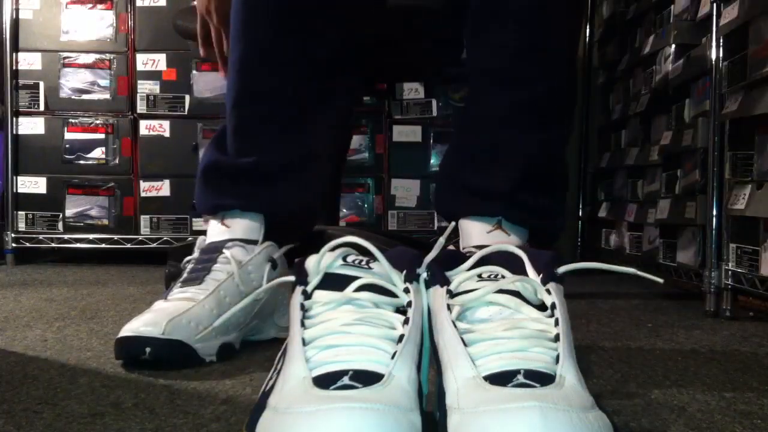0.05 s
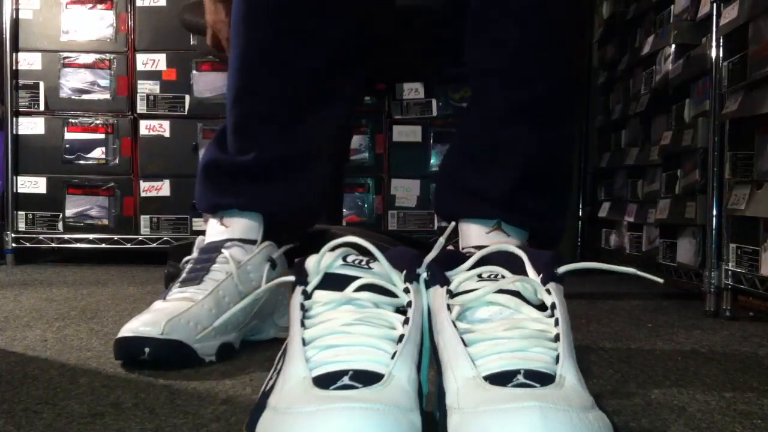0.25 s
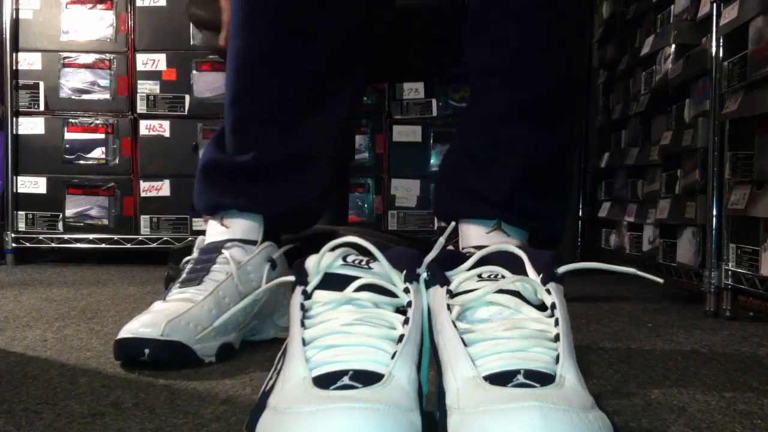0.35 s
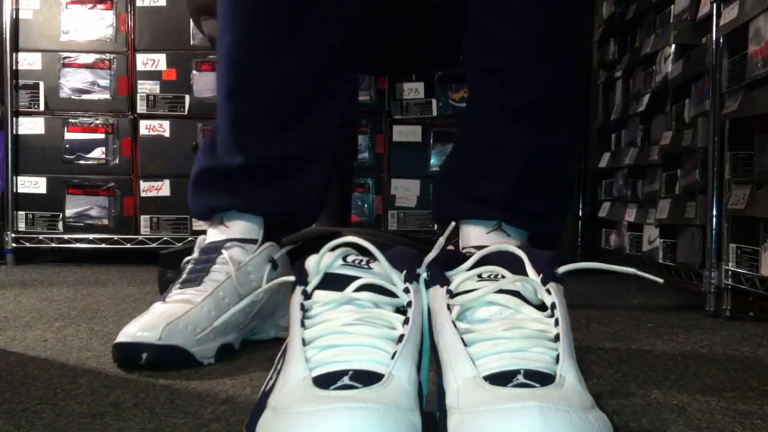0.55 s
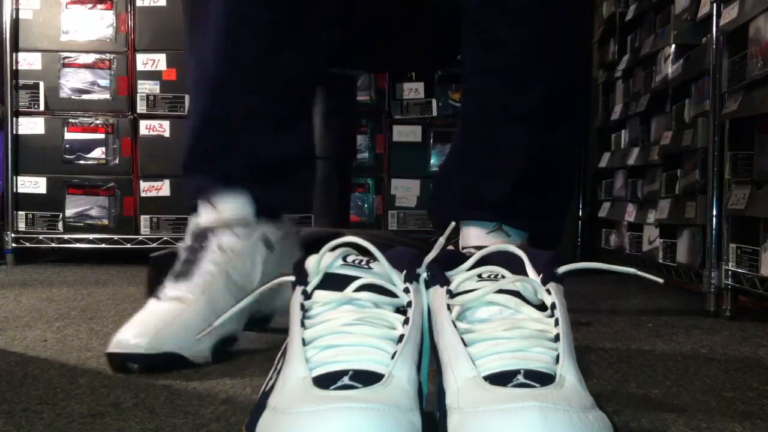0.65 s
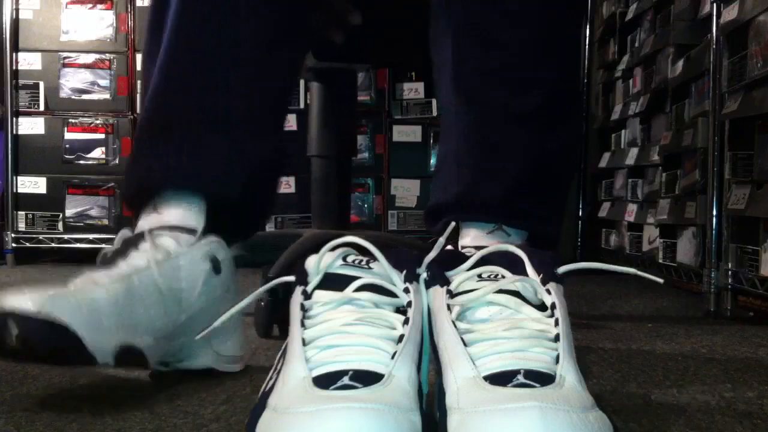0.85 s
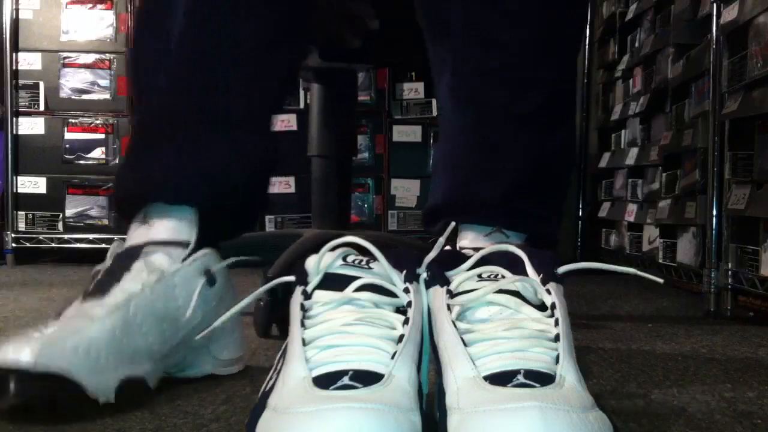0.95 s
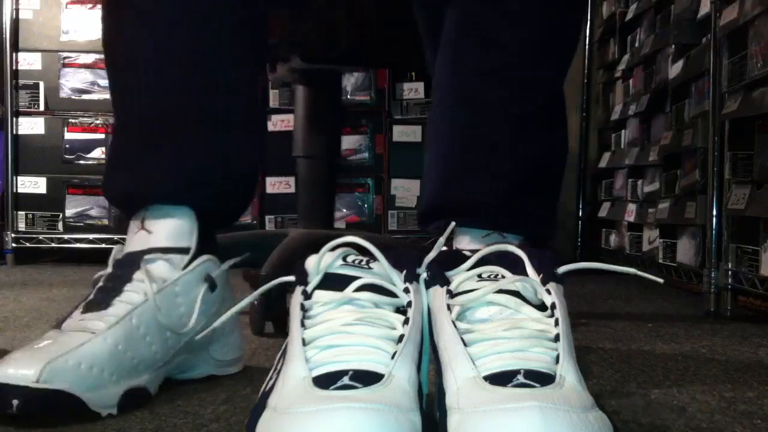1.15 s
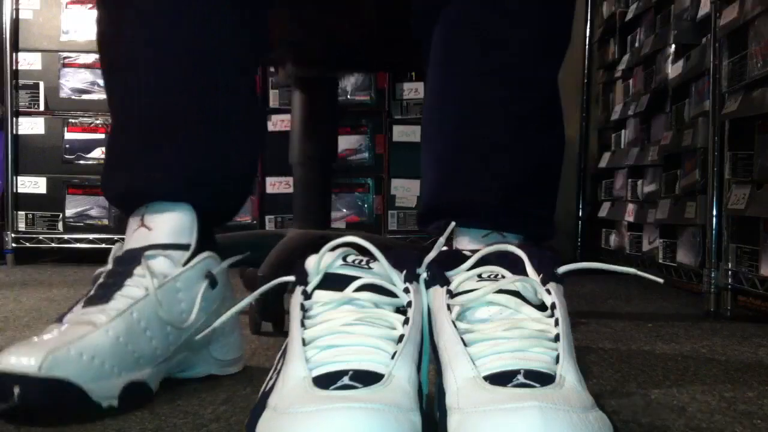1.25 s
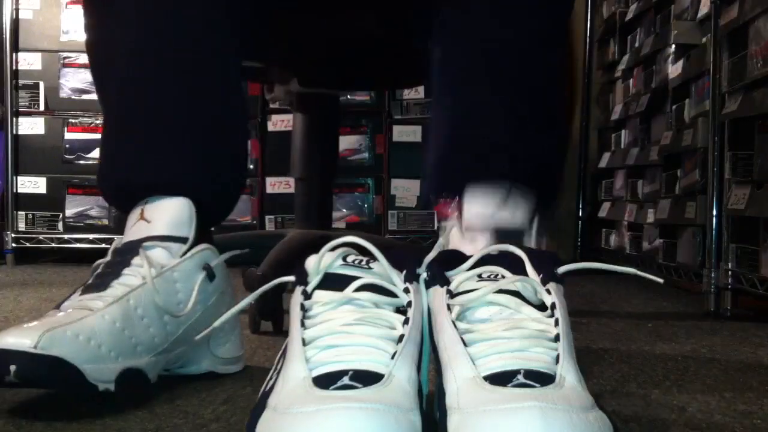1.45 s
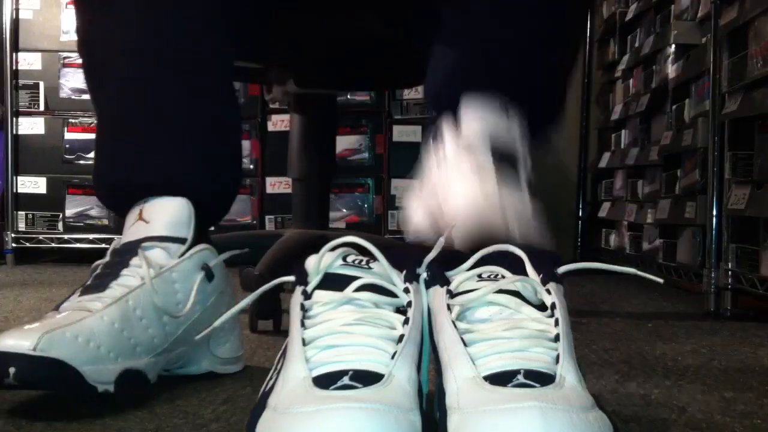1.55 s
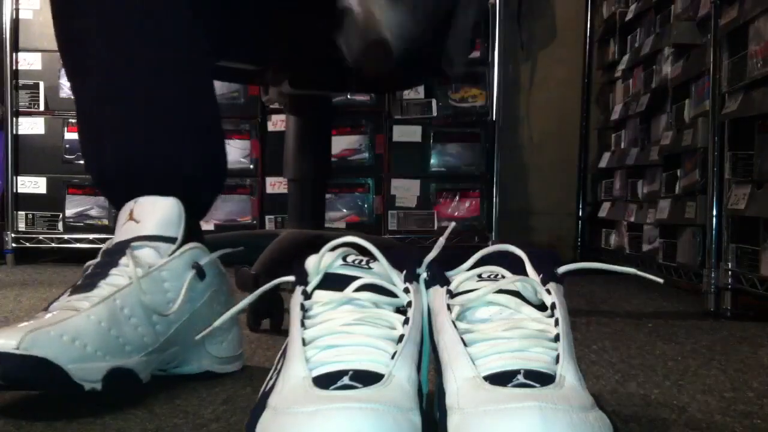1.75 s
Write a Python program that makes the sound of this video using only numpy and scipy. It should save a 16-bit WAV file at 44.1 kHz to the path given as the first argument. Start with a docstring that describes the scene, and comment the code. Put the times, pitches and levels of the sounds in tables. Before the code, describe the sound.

Shoes shuffle over a carpeted floor with soft thuds, light ticks and rustling cloth.

```python
"""Someone on a swivel chair shifts both sneakers over the carpet of a small room lined with boxes.
First the soles scuff and one shoe gives a short creak. Then trouser cloth rustles and small hard
parts (probably lace tips) tick and rattle. The shoes land with soft thuds, the loudest about halfway
through. The scuffs die away and a fine, high swish of cloth comes last.
Ventilation and a faint hiss lie underneath the whole time."""
import sys
import numpy as np
from scipy import signal
from scipy.fft import rfft, irfft
from scipy.io import wavfile

SR = 44100
rng = np.random.default_rng(int(sys.argv[2]) if len(sys.argv) > 2 else 0)


def output_pcm(signal):
    """Save a mono or channel-first signal as 16-bit PCM at the path in sys.argv[1].

    Samples are clipped to [-1, 1] before scaling.
    """
    pcm = np.clip(np.atleast_2d(signal).T, -1, 1) * 32767
    wavfile.write(sys.argv[1], SR, np.round(pcm).astype(np.int16))


N = 79380
TIME = np.arange(N) / SR


def from_db(db):
    """Turn decibels into a number to multiply by."""
    return 10 ** (np.asarray(db) / 20)


def rms_one(x):
    """Scale a sound so that its average strength (rms) is 1."""
    return x / np.sqrt(np.mean(x ** 2) + 1e-20)


def coloured(x, spectrum):
    """Shape a sound's lows and highs with rows of (pitch_hz, level_db); its strength ends up at 1."""
    hz, db = np.transpose(spectrum)
    bin_hz = np.maximum(np.arange(N // 2 + 1) * SR / N, 1)
    gain = from_db(np.interp(np.log(bin_hz), np.log(hz), db))
    return rms_one(irfft(rfft(x) * gain, N))


def swell(start_s, rise_s, fade_s):
    """A loudness curve that rises smoothly to 1, then drops 60 dB in fade_s."""
    age = TIME - start_s
    rise = np.sin(np.pi / 2 * np.clip(age / rise_s, 0, 1)) ** 2
    return rise * np.exp(-np.log(1000) * np.maximum(age - rise_s, 0) / fade_s)


def resonate(x, pitch_hz, width_hz):
    """Let through the part of a sound that lies near one pitch."""
    return signal.lfilter(*signal.iirpeak(pitch_hz, pitch_hz / width_hz, fs=SR), x)


def friction(snaps_per_s=1900, spread_db=2):
    """Fibres catch and let go: tiny random snaps on top of a smooth rush."""
    sizes = from_db(spread_db * np.minimum(rng.exponential(1, N), 4)) * rng.choice([-1, 1], N)
    snaps = rms_one(sizes * (rng.random(N) < snaps_per_s / SR))
    return rms_one(snaps + 0.46 * rng.standard_normal(N))


# Strokes of sole and cloth: start_s, rise_s, shoe_db, carpet_db, cloth_db
STROKES = [(0.155, 0.026, -59.5, -62, -82), (0.221, 0.013, -50.5, -61, -78),
           (0.278, 0.032, -64, -52.5, -56), (0.456, 0.028, -51.5, -51, -51),
           (0.503, 0.016, -53.5, -51, -52), (.556, 0.019, -56.5, -56, -64),
           (0.581, 0.016, -55, -49.5, -51.5), (0.645, 0.03, -54, -53, -53), (0.699, 0.013, -57.5, -53, -57),
           (0.745, 0.031, -55, -51.5, -55), (0.822, 0.0068, -56, -60, -49), (0.873, 0.023, -86, -53.5, -52),
           (0.997, 0.024, -59.5, -53.5, -53), (1.039, 0.032, -63, -60.5, -58.5),
           (1.134, 0.015, -45, -45.5, -51), (1.180, 0.055, -53.5, -59.5, -76),
           (1.229, 0.011, -55, -44, -52), (1.255, 0.0066, -52.5, -66, -61), (1.298, 0.017, -46.5, -66, -65),
           (1.33, 0.0054, -45.5, -51.5, -45), (1.34, 0.011, -51, -42, -44), (1.365, 0.021, -54, -47.5, -46),
           (1.429, 0.027, -60.5, -59, -80), (1.484, 0.011, -57.5, -60.5, -62),
           (1.516, 0.035, -61, -61, -59)]
# The tone of the hollow shoe, the rasping carpet and the hissing cloth: pitch_hz, level_db
SHOE_TONE = [(80, -51), (160, -5.5), (290, -1), (480, -4.5), (600, -8), (850, -4.5), (1500, -23.5),
             (3000, -38.5)]
CARPET_TONE = [(100, -29), (350, -8), (800, -0.5), (1200, 0), (1900, 3.5), (2700, -1), (4000, -3.5),
               (6000, -16), (12000, -18)]
CLOTH_TONE = [(1500, -5), (3000, -1), (4400, 3), (5200, -1), (6200, -1), (8300, -3.5), (11000, -9.5),
              (13000, -12), (16000, -30)]
# Pitches at which shoe and floor ring in every scuff: pitch_hz, boost_db
SHOE_AND_FLOOR_RINGS = [(500, 6), (1240, 5.5), (1850, 4), (2650, 3)]

def scuffs():
    """Each stroke makes the hollow shoe sound, the carpet rasp and the cloth hiss."""
    rubbing = 0
    for part, (tone, fade_s) in enumerate([(SHOE_TONE, 0.2), (CARPET_TONE, 0.19), (CLOTH_TONE, 0.13)]):
        power = sum((from_db(levels_db[part]) * swell(start_s, rise_s, fade_s)) ** 2
                    for start_s, rise_s, *levels_db in STROKES)
        rubbing += np.sqrt(power) * coloured(friction(), tone)
    return rubbing + sum((from_db(boost_db) - 1) * resonate(rubbing, pitch_hz, width_hz=32)
                         for pitch_hz, boost_db in SHOE_AND_FLOOR_RINGS)


# Soles meeting the floor: start_s, level_db, pitch_hz, fade_s
LANDINGS = [(0.527, -36, 534, 0.024), (.540, -38, 850, 0.046), (0.9413, -24.5, 187.8, 0.065),
            (1.147, -36.5, 388, 0.11), (1.184, -39.5, 251.5, 0.086), (1.201, -33, 331, 0.036),
            (1.221, -34, 264, 0.034), (1.333, -28, 211, 0.032)]
# The tones that make up one thud: pitch_multiple, offset_db
SOLE_TONES = [(1, -6), (2.05, -18), (3.7, -24.5)]

def thuds(carpet_give_s=0.0023):
    """The sole lands, cushioned by the carpet, and rings briefly; its higher tones die sooner."""
    out = np.zeros(N)
    for start_s, level_db, pitch_hz, fade_s in LANDINGS:
        for multiple, offset_db in SOLE_TONES:
            loudness = from_db(level_db + offset_db) * swell(start_s, carpet_give_s, fade_s / np.sqrt(multiple))
            out += loudness * np.sin(2 * np.pi * pitch_hz * multiple * (TIME - start_s))
    return out


# Little knocks of the hard tips: start_s, level_db, brightest_hz, fade_s
TIP_KNOCKS = [(.303, -48, 7000, .08), (.304, -47, 11500, 0.074), (.571, -42, 9800, 0.044),
              (.596, -47, 6100, 0.09), (0.652, -52, 8300, 0.043), (.664, -52, 9600, 0.035),
              (.709, -44, 8600, 0.055), (0.719, -45.5, 8400, 0.041), (0.8268, -43, 9300, 0.059),
              (0.877, -42, 5600, .05), (.955, -52, 10600, 0.054), (1.072, -53, 5500, .04),
              (1.159, -49, 8200, 0.056), (1.2188, -44, 7040, 0.041), (1.2611, -43.5, 6170, 0.069),
              (1.331, -50, 8000, 0.095), (1.349, -41, 8700, 0.1), (1.548, -48, 12700, 0.024)]

def ticks(tone_count=44):
    """Each tick is a short, noisy chatter that sets the tips ringing, plus a jingle of many weak tones."""
    chatter, jingle = np.zeros(N), np.zeros(N)
    even_hz = np.linspace(3500, 14500, tone_count)
    tone_bins = (even_hz * N / SR + rng.normal(0, 130, tone_count)).astype(int)  # unevenly spaced
    for start_s, level_db, brightest_hz, fade_s in TIP_KNOCKS:
        spectrum = np.zeros(N // 2 + 1, complex)
        spectrum[tone_bins] = rng.standard_normal(tone_count) + 1j * rng.standard_normal(tone_count)
        rise_s, width_hz = 0.00058, 0.49 * brightest_hz
        noise = rms_one(resonate(rng.standard_normal(N), brightest_hz, width_hz))
        tones = rms_one(resonate(irfft(spectrum, N), brightest_hz, width_hz))
        chatter += from_db(level_db) * swell(start_s, rise_s, fade_s) * noise
        jingle += from_db(level_db) * swell(start_s, rise_s, 1.4 * fade_s) * tones
    return from_db(-6) * chatter + from_db(-6.5) * jingle + from_db(9.5) * tip_ring(chatter)


# The tones the hard tips ring with: pitch_hz, level_db
TIP_TONES = [(3290, 10), (4120, 2), (4570, 4), (4705, -6), (5280, -1.5), (5740, -6), (6230, -4.5),
             (7040, -0.5), (7750, -1.5), (8383, -2.5), (8670, -4), (9460, -4.5), (10200, -2), (11200, -5.5),
             (12400, -11)]

def tip_ring(shaking, sharpness=118):
    """Knocked or shaken, the hard tips ring at their own pitches."""
    return sum(from_db(level_db) * resonate(shaking, pitch_hz, pitch_hz / sharpness)
               for pitch_hz, level_db in TIP_TONES)


def rattle(start_s=0.565, length_s=0.19, touches_per_s=150):
    """While the foot swings, the tips keep touching lightly."""
    swing = np.sqrt(np.sin(np.pi * np.clip((TIME - start_s) / length_s, 0, 1)) + 1e-12)
    touches = rng.standard_normal(N) * (rng.random(N) < touches_per_s / SR)
    return from_db(-64.5) * rms_one(tip_ring(touches * swing))


def ping(pitch_hz=3666):
    """One small metal part rings on alone."""
    loudness = from_db(-55.5) * swell(start_s=1.048, rise_s=0.03, fade_s=0.35)
    return loudness * np.sin(2 * np.pi * pitch_hz * TIME)


def creak(start_s=0.22, length_s=0.036, pitch_hz=270, glide_hz_per_s=3000):
    """The shoe sticks and slips about a dozen times, rising in pitch and growing harsher."""
    age = np.clip(TIME - start_s, 0, length_s)
    progress = age / length_s
    phase = 2 * np.pi * np.cumsum(pitch_hz + glide_hz_per_s * age) / SR
    overtones = from_db(-23) * 2 * progress * (np.sin(2 * phase) + 0.5 * np.sin(3 * phase))
    loudness = from_db(-43.5) * np.sin(np.pi * np.sqrt(progress)) ** 2
    return loudness * (np.sin(phase) + overtones)


# How loud the sliding trousers are: time_s, level_db
TROUSER_LEVELS = [(.44, -78), (.50, -66.5), (1.0, -61.5), (1.40, -60.5), (1.62, -71), (1.80, -65.5)]

def cloth(swish_start_s=1.62, swish_rise_s=0.1):
    """Trouser legs slide softly as the legs move; at the end a fine, high swish joins in."""
    fade_in = np.clip((TIME - swish_start_s) / swish_rise_s, 0, 1)
    swish = from_db(-67) * fade_in * rms_one(resonate(friction(), pitch_hz=13300, width_hz=3000))
    loudness = from_db(np.interp(TIME, *np.transpose(TROUSER_LEVELS)))
    return swish + loudness * coloured(friction(), CLOTH_TONE)


def room(x, dull_above_hz=3600):
    """The room adds a short blur of echoes, dulled by carpet and boxes."""
    echoes = rng.standard_normal(N) * swell(start_s=0.00433, rise_s=0.0034, fade_s=0.3)
    echoes = signal.sosfilt(signal.butter(1, dull_above_hz, fs=SR, output="sos"), echoes)
    return from_db(-14.5) * signal.fftconvolve(x, echoes / np.sqrt(np.sum(echoes ** 2)))[:N]


# The tone of the steady rumble and hiss: pitch_hz, level_db
BACKGROUND_TONE = [(75, -28.5), (140, 3.5), (200, 0), (480, -2), (1000, -12.5), (1800, -13.5), (4000, -24),
                   (16000, -20.5)]

def ventilation(hum_hz=189.3):
    """The ventilation rumbles and hums weakly, along with a faint hiss."""
    hum = from_db(-67) * np.sin(2 * np.pi * (hum_hz * TIME + rng.random()))
    return hum + from_db(-61.5) * coloured(rng.standard_normal(N), BACKGROUND_TONE)


def scene(shake_above_hz=4400, bass_cut_hz=140):
    """Feet and clothes in the room; the scuffing also shakes the tips."""
    rubbing = scuffs()
    shaking = signal.sosfilt(signal.butter(4, shake_above_hz, "high", fs=SR, output="sos"), rubbing)
    bright = rubbing + from_db(1) * tip_ring(shaking) + ticks() + rattle() + ping()
    low = signal.sosfilt(signal.butter(2, bass_cut_hz, "high", fs=SR, output="sos"), thuds() + creak())
    echoes = room(bright + from_db(-9) * low)  # thuds are close and deadened by the carpet
    return (bright + low + echoes + cloth() + ventilation())[None]


def record(dry, cutoff_hz=16000):
    """Cut away the very highest treble."""
    return signal.sosfilt(signal.ellip(10, 0.1, 70, cutoff_hz, fs=SR, output="sos"), dry)


dry = scene()
out = record(dry)
output_pcm(out)
```